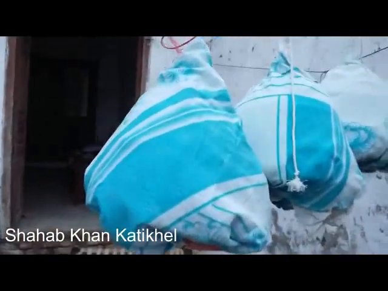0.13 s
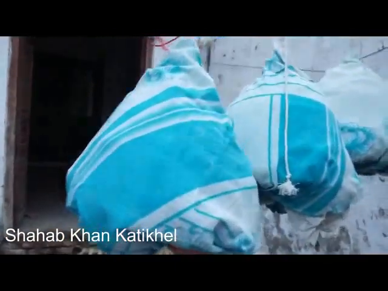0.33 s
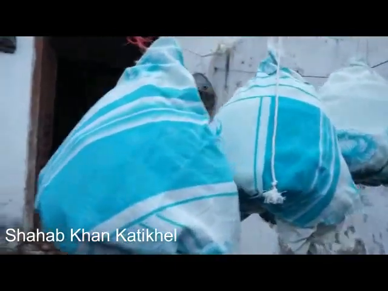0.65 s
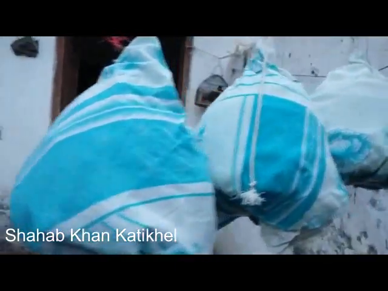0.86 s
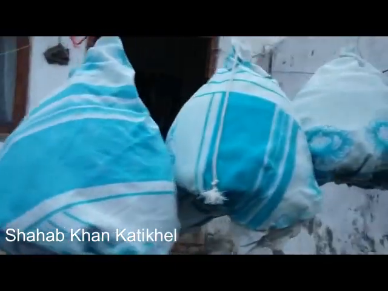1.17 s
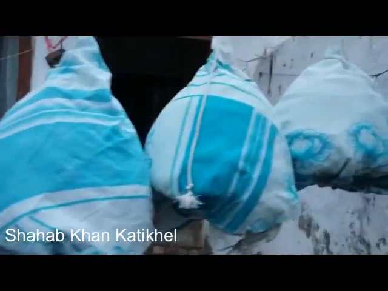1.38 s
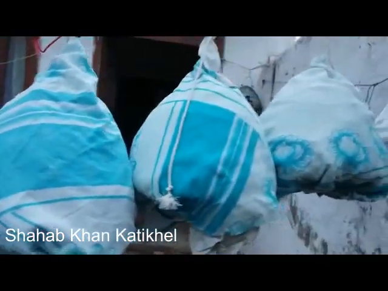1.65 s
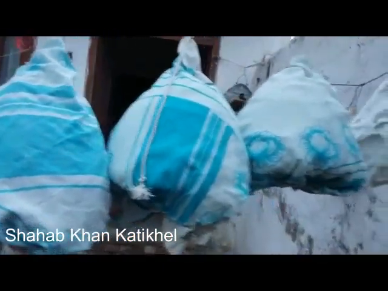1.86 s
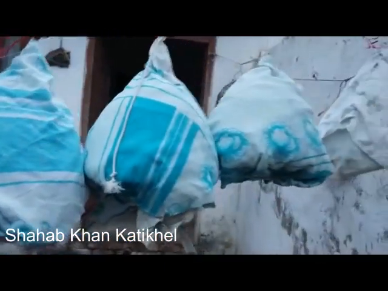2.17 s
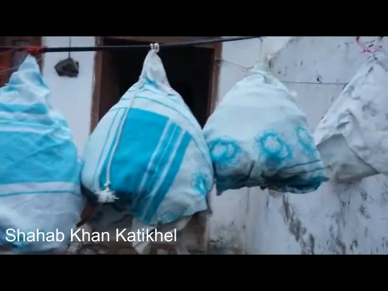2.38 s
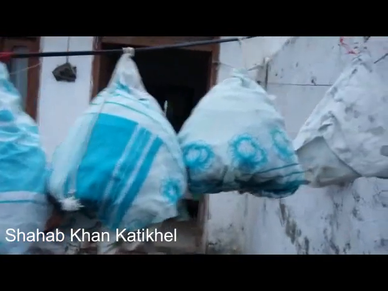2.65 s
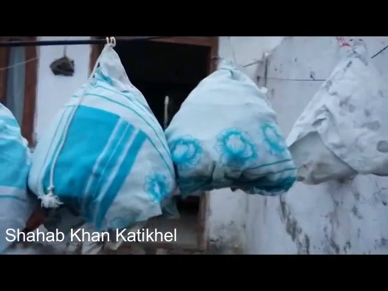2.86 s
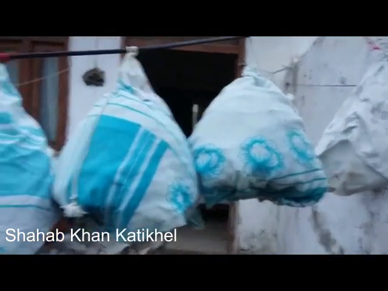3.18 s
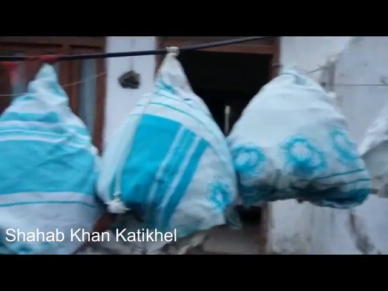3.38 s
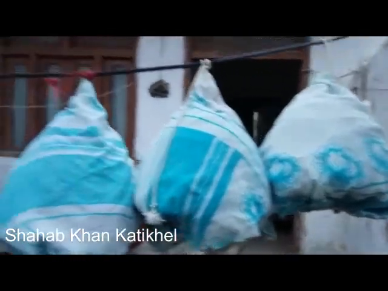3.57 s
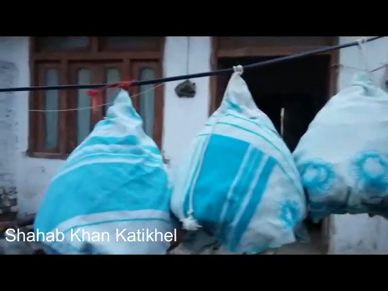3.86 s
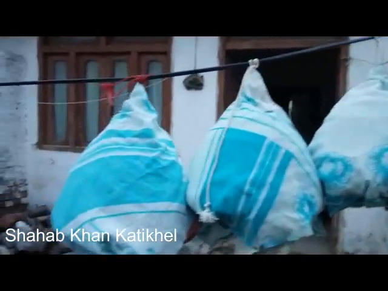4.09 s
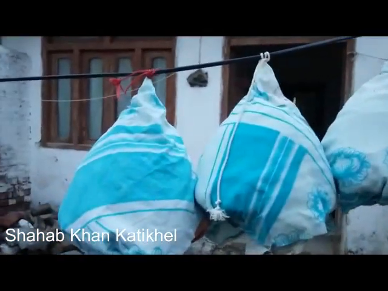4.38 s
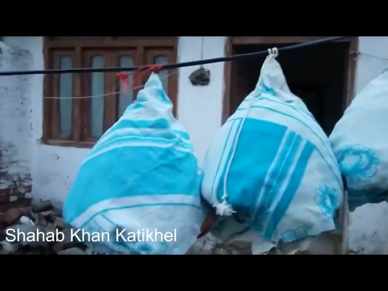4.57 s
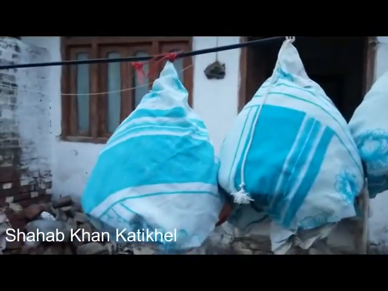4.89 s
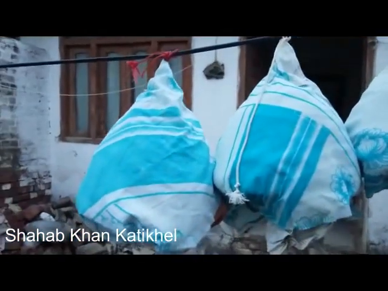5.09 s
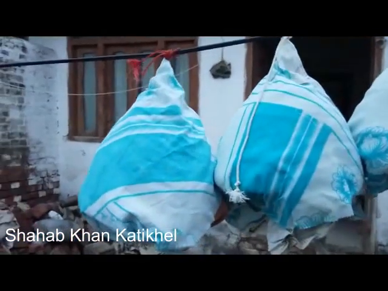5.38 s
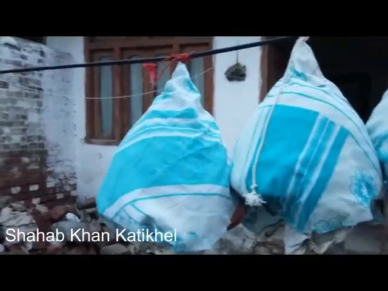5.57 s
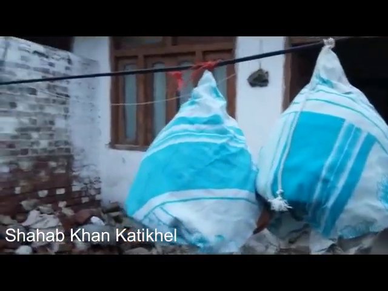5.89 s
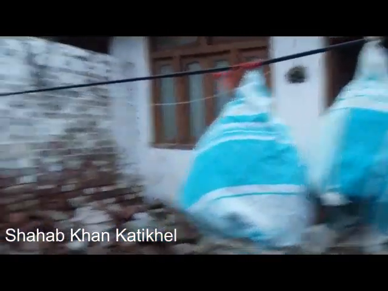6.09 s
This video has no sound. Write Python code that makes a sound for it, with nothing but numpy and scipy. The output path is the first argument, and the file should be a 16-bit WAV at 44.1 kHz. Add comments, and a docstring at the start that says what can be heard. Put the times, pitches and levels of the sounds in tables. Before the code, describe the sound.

Quails call in a walled courtyard. One gives four pairs of sharp, high whistles that flick upward, while another answers early on with quick, lower whip-like chirps in threes. After a short lull comes a brief nasal growl as a distant bird pipes, then one last chirp. The calls sound close, each with a short bright echo, over a faint rush of air and far traffic.

```python
"""A walled courtyard where caged quails call. One gives pairs of high whistles that flick upward;
another gives quick low whips in threes and later a nasal growl. Whistles and whips are gliding tones
from the bird's voice box; the growl is pulses and breath ringing in its throat. A far bird pipes and
the cages knock softly. The walls smear every call into a short bright tail, over the air, hum and
distant chatter of the neighbourhood."""
import sys
import numpy as np
from scipy import signal
from scipy.io import wavfile
from scipy.ndimage import uniform_filter1d

SR = 44100
rng = np.random.default_rng(int(sys.argv[2]) if len(sys.argv) > 2 else 0)


def dump(signal):
    """Clip the signal to [-1, 1] and save it as 16-bit WAV at the path in sys.argv[1]."""
    limited = np.clip(np.atleast_2d(signal).T, -1, 1)
    pcm = np.round(limited * 32767).astype(np.int16)
    wavfile.write(sys.argv[1], SR, pcm)


N = 275184
LEAD = SR // 5  # samples before the start, so that earlier calls still ring


def quail_whistles():
    """Each whistle slides into a held note, creeps up, then flicks about an octave higher and fades."""
    # Each row: start, hold and flick in seconds; entry, dip, end-of-hold and top pitch in Hz; level in dB.
    calls = [(-.018, .070, 0.02, 3700, 3330, 3780, 7280, -9),
             (.225, 0.045, .022, 3510, 3266, 3820, 6770, -8),
             (1.165, 0.072, .020, 3830, 3449, 3738, 7250, -9),
             (1.407, 0.046, 0.026, 3600, 3331, 3800, 6900, -9),
             (2.349, 0.072, .021, 3870, 3386, 3705, 7170, -9.5),
             (2.59, 0.047, 0.025, 3690, 3350, 3820, 6590, -8),
             (3.501, 0.073, .019, 4052, 3500, 3790, 7290, -7),
             (3.743, 0.048, .022, 3796, 3394, 3904, 6630, -9.5)]
    shape_db = np.array([-23.5, -6.5, 2.5, -2.5, 2, -3, -11.5, -14])
    for start, hold, flick, entry, dip, knee, top, db in calls:
        hold_times = hold * np.array([0, .12, .45, .8, 1])
        flick_times = hold + flick * np.array([.4, .8, 1.13])
        hold_hz = [entry, .4 * entry + .6 * dip, dip, .6 * dip + .4 * knee, knee]
        flick_hz = [knee + .5 * (top - knee), knee + .91 * (top - knee), top]
        times = np.concatenate([hold_times, flick_times])
        yield start, tone(times, hold_hz + flick_hz, db + shape_db, overtones_db=[-38, -46])


def quail_whips():
    """Each whip is a soft rising tone that swells and snaps upward."""
    # Each row: time of the snap and length of the lead-in in seconds, base entry pitch in Hz,
    # a factor on all its pitches, level in dB.
    calls = [(-.09, .02, 1294, 0.97, -7.5), (.526, .016, 1236, 1.007, -4), (.726, 0.029, 1047, 1, -2),
             (.832, .014, 1298, 0.99, -5), (1.487, 0.014, 1246, 1.01, -5), (1.692, 0.026, 1001, 0.99, -2),
             (1.800, .014, 1303, 1, -5), (6.250, 0.032, 900, 1.02, -5)]
    # After the lead-in. Each row: seconds from the snap, base pitch in Hz, level change in dB.
    stroke = [(-.013, 1654, -23.5), (-.007, 1874, -3), (-.001, 2305, -6.5), (.002, 2900, -7.5),
              (.005, 4700, -20.5)]
    for snap, lead_in, entry_hz, pitch_factor, db in calls:
        entry = (stroke[0][0] - lead_in, entry_hz, -32)
        times, hz, shape_db = np.transpose([entry] + stroke)
        yield snap + times[0], tone(times, pitch_factor * hz, db + shape_db, overtones_db=[-30, -45])


def quail_gulps():
    """A faint throaty note sags in pitch between the second and third whip."""
    # Each row: start and length in seconds, pitch in Hz, level in dB.
    notes = [(0.754, 0.069, 594, -39), (1.722, .07, 590.6, -37.5)]
    for start, length, hz, db in notes:
        yield start, short_note(length, hz, .97 * hz, db, overtones_db=[3, -8])


def quail_growl():
    """Pulses in strong-weak pairs and puffs of breath ring in a throat that the beak opens."""
    # Each row: time in seconds, rate of pulse pairs in Hz, effort in dB, roughness from 0 to 1,
    # unevenness of each pair from 0 to 1, beak opening as a factor on the throat's pitches.
    gesture = [(5.325, 378.6, -51, .8, 0.23, 0.88), (5.355, 404.8, -31, 0.74, 0.2, 0.934),
               (5.372, 408.4, -32.5, 0.13, 0.2, 1.057), (5.446, 428, -29.5, 0.13, 0.4, 1.02),
               (5.47, 429.2, -28.5, 0, 0.4, 0.87), (5.545, 431.4, -25.5, 0.13, 0.55, .95),
               (5.558, 411.5, -23.5, 0.6, 0.5, 1.094), (5.58, 406, -22, 0.42, 0.75, 1.144),
               (5.60, 407.7, -30, 0, 0.2, 1.003), (5.625, 404, -34, 0.24, 0.4, 0.97),
               (5.646, 390, -27, 0.73, .3, 0.867), (5.665, 369.2, -34, .8, .3, .9)]
    # The throat's resonances. Each row: base pitch in Hz, width in Hz, level in dB.
    throat = [(863, 283, 0.5), (1700, 420, 6.5), (2495, 530, -3.5), (4220, 1100, -21.5), (5060, 500, -25)]
    times, *columns = np.transpose(gesture)
    t = np.arange(times[0], times[-1], 1 / SR)
    hz, effort_db, rough, uneven, beak = (np.interp(t, times, column) for column in columns)
    wobble = .13 * uniform_filter1d(rng.standard_normal(len(t)), size=200)
    turns = np.cumsum(hz * (1 + wobble)) / SR
    # unequal pulses put weaker overtones midway between the main ones
    pulses = sum((uneven if k % 2 else 1) * np.cos(2 * np.pi * k * turns) for k in range(2, 15))
    puffs = (.38 + np.exp(-(2 * turns % 1) / .34)) * rng.standard_normal(len(t))
    drive = (1 - rough) * unit_level(pulses) + 1.5 * rough * unit_level(puffs)
    voice = np.zeros(len(t))
    for k, (base_hz, width, db) in enumerate(throat):
        ringing = resonate(drive, base_hz * beak, width)
        voice += (-1) ** k * amp(db) * resonate(ringing, base_hz * beak, width)
    yield times[0], amp(effort_db) * unit_level(voice) * signal.windows.tukey(len(t), .05)


def far_bird():
    """A distant bird pipes thin, almost pure notes."""
    # Each row: start and length in seconds, first and last pitch in Hz, level in dB.
    notes = [(4.803, 0.063, 2700, 2880, -37.5), (4.962, 0.047, 2760, 2720, -35.5),
             (5.492, .06, 2720, 2870, -19.5), (5.663, 0.042, 2760, 2800, -26),
             (4.80, .025, 5200, 4200, -55.5), (3.30, 0.098, 8500, 8500, -65.5),
             (4.15, .1, 8300, 7700, -65.5), (5.05, .12, 9000, 8200, -65), (5.86, .1, 8500, 7900, -66)]
    for start, length, first_hz, last_hz, db in notes:
        yield start, short_note(length, first_hz, last_hz, db, overtones_db=[-35])


def cage_knocks():
    """Dull knocks and rustles: fast-dying puffs of noise through a broad resonance."""
    # Each row: start in seconds, level in dB, centre pitch in Hz, fading time in seconds.
    knocks = [(1.94, -43.5, 3000, .006), (2.012, -41, 2380, 0.0074), (5.19, -57, 4000, .004)]
    t = np.arange(2000) / SR
    for start, db, hz, decay in knocks:
        puff = resonate(rng.standard_normal(len(t)), hz, width_hz=2200)
        yield start, amp(db - 8.7 * t / decay) * unit_level(puff)


def distant_chatter():
    """Small birds far away blur into patchy, high noise that comes and goes."""
    # Each row: time in seconds, level in dB.
    levels = [(0.0, -34.5), (0.12, -45), (0.17, -46), (0.31, -53), (0.59, -53), (0.75, -50), (0.97, -65),
              (1.22, -44.5), (1.27, -48.5), (1.34, -51), (1.39, -49.5), (1.51, -56.5), (1.68, -49.5),
              (1.86, -44.5), (2.03, -70), (2.31, -57), (2.4, -45), (2.54, -43.5), (2.59, -43.5), (2.8, -55),
              (3.06, -51), (3.3, -58), (3.56, -64), (3.67, -33.5), (3.72, -42), (3.79, -44.5),
              (3.96, -57.5), (4.07, -64.5), (4.73, -65), (4.93, -59), (5.4, -65.5), (5.54, -48), (5.6, -54),
              (5.79, -61.5), (6.24, -63)]
    # Each row: frequency in Hz, relative strength in dB.
    colour = [(880, -38), (1500, -14), (2300, -6), (3130, -7.5), (4180, 1.5), (4910, -14.5), (7000, -16),
              (9100, -57), (15400, -120)]
    return amp(curve(levels)) * noise(colour, patchy_db=8)


def air_and_traffic():
    """Air and traffic make a low rush that slowly swells and sinks."""
    # Each row: frequency in Hz, relative strength in dB.
    colour = [(15, -62.5), (25, -40), (90, -3.5), (129, -17), (172, -9), (198, -5), (359, -13),
              (386, -13.5), (683, -12.5), (867, -15), (1000, -15), (2090, -21.5), (7380, -32.5),
              (9590, -67.5), (16200, -120)]
    # Each row: time in seconds, level in dB (only its swing around the average counts).
    swells = [(0.0, -58.5), (0.73, -55.5), (1.43, -58.5), (1.55, -56), (1.77, -53.5), (2.29, -58.5),
              (2.88, -55.5), (3.67, -59.5), (3.82, -57), (4.45, -60.5), (5.32, -58), (5.56, -53),
              (5.96, -60), (6.24, -58.5)]
    swell_db = curve(swells)
    return amp(-53 + swell_db - swell_db.mean()) * noise(colour, patchy_db=1.6)


def machine_hum():
    """A far machine hums: noise through very narrow resonances gives wavering low tones."""
    # Each row: pitch in Hz, level in dB.
    tones = [(86, -60.5), (171, -66.5), (227, -67)]
    return sum(amp(db) * unit_level(resonate(rng.standard_normal(N), hz, width_hz=4)) for hz, db in tones)


def microphone_hiss():
    """A faint high hiss rises and falls."""
    # Each row: time in seconds, level in dB.
    levels = [(0.0, -56), (0.14, -53), (0.36, -61), (0.76, -57), (0.96, -62), (1.23, -54), (1.37, -56.5),
              (1.79, -59), (2.12, -67.5), (2.4, -54), (2.55, -60.5), (2.68, -59.5), (2.82, -60),
              (3.34, -63.5), (3.56, -63.5), (3.7, -55.5), (4.03, -70), (4.24, -65), (4.85, -64.5),
              (4.99, -63.5), (5.4, -62.5), (5.61, -57), (5.87, -63.5), (6.24, -64.5)]
    return amp(curve(levels)) * noise([(3000, -31), (8000, -3.5), (15000, -6.5)], patchy_db=-.4)


def wall_echo(sound, echo_db):
    """Adds many small reflections from the walls; the treble dies away first."""
    # Each row: frequency in Hz, seconds its echo takes to fade by 60 dB.
    fade_times = [(800, .4), (2000, 0.36), (4000, 0.31), (7000, .26), (12000, .15)]
    bounces = np.zeros(SR * 6 // 10)
    slots = np.arange(0, len(bounces) - 20, 20)
    strengths = rng.choice([-1., 1.], len(slots)) * amp(3 * rng.standard_normal(len(slots)))
    bounces[slots + rng.integers(0, 20, len(slots))] = strengths
    bounces[:round(.004 * SR)] = 0  # a short gap before the first reflection
    hz, t, spectra = signal.stft(bounces, SR, nperseg=256)
    fade = amp(-60 * t / at_frequency(fade_times, hz)[:, None])
    tail = signal.istft(spectra * fade, SR, nperseg=256)[1]
    tail *= amp(echo_db) / np.linalg.norm(tail)
    tail[0] += 1  # the direct sound
    return signal.fftconvolve(sound, tail)


def tone(times, hz, db, overtones_db):
    """A bird's voice box sings a tone with overtones along smoothed pitch and level curves."""
    t = np.arange(times[0], times[-1], 1 / SR)
    hz, db = (uniform_filter1d(np.interp(t, times, c), size=90, mode="nearest") for c in (hz, db))
    phase = 2 * np.pi * np.cumsum(hz) / SR
    overtones = sum(amp(level) * np.sin(k * phase) for k, level in enumerate(overtones_db, start=2))
    return amp(db) * (np.sin(phase) + overtones) * signal.windows.tukey(len(t), .08)


def short_note(length, first_hz, last_hz, db, overtones_db):
    """A short bird note that swells and stops."""
    times = length * np.array([0, .3, .85, 1])
    shape_db = np.array([-5.5, -6, 1.5, -7])
    return tone(times, np.linspace(first_hz, last_hz, 4), db + shape_db, overtones_db)


def noise(colour, patchy_db):
    """Noise of the given colour, with random louder and softer patches in time and pitch."""
    frames, hz = N // 256 + 5, np.fft.rfftfreq(1024, 1 / SR)
    real, imaginary, patches = rng.standard_normal((frames, 513, 3)).T
    patches = uniform_filter1d(patches, size=12, axis=0)
    patches = unit_level(uniform_filter1d(patches, size=10, axis=1))
    spectra = (real + 1j * imaginary) * amp(at_frequency(colour, hz)[:, None] + patchy_db * patches)
    return unit_level(signal.istft(spectra, nperseg=1024, noverlap=768)[1][:N])


def resonate(x, hz, width_hz):
    """A resonance that can glide: shifts the pitch hz down to zero, smooths, and shifts back."""
    spin = np.exp(2j * np.pi * np.cumsum(hz * np.ones(len(x))) / SR)
    memory = np.exp(-np.pi * width_hz / SR)
    return 2 * (spin * signal.lfilter([1 - memory], [1, -memory], x / spin)).real


def amp(db):
    return 10 ** (np.asarray(db) / 20)


def unit_level(x):
    return x / np.sqrt(np.mean(x ** 2) + 1e-20)


def at_frequency(rows, hz):
    known_hz, values = np.transpose(rows)
    return np.interp(np.log(hz + 1), np.log(known_hz + 1), values)


def curve(rows):
    times, values = np.transpose(rows)
    return np.interp(np.arange(N) / SR, times, values)


def scene():
    """Places each call and knock with its echo, then adds the background."""
    mix = np.zeros(LEAD + N)
    # Each pair: a source, and the level of its echo in dB against the direct sound.
    for source, echo_db in [(quail_whistles, -3), (quail_whips, -.5), (quail_gulps, -6),
                            (far_bird, -10.5), (cage_knocks, .5), (quail_growl, -9)]:
        for start, sound in source():
            heard = wall_echo(sound, echo_db)
            part = mix[LEAD + round(start * SR):][:len(heard)]
            part += heard[:len(part)]
    background = air_and_traffic() + machine_hum() + distant_chatter() + microphone_hiss()
    return (mix[LEAD:] + background)[None]


def record(dry):
    """The recorder cuts off the very highest treble."""
    cutoff_hz = 15300
    low_pass = signal.firwin(511, cutoff_hz, window=("kaiser", 9), fs=SR)
    return signal.oaconvolve(dry, low_pass[None], "same")


dry = scene()
out = record(dry)
dump(out)
```